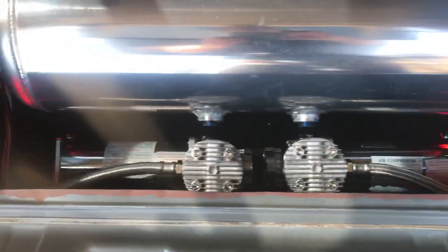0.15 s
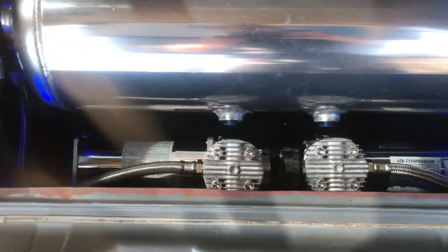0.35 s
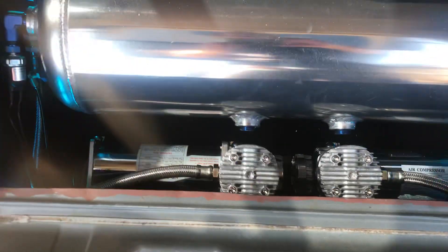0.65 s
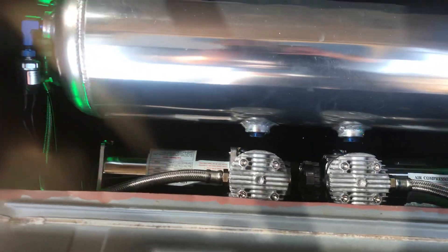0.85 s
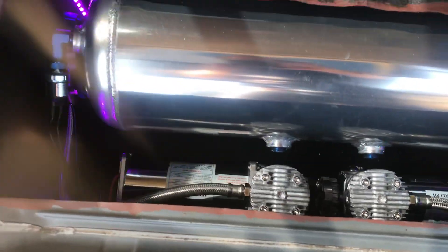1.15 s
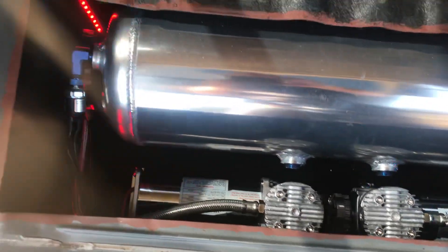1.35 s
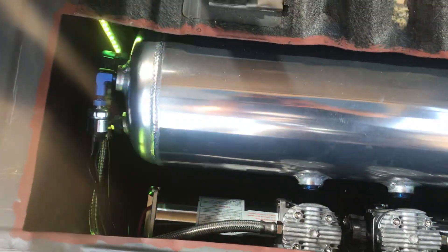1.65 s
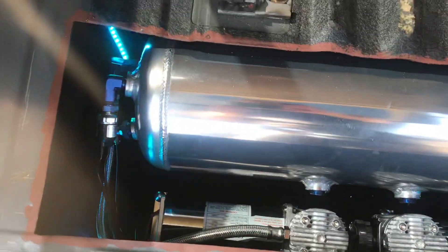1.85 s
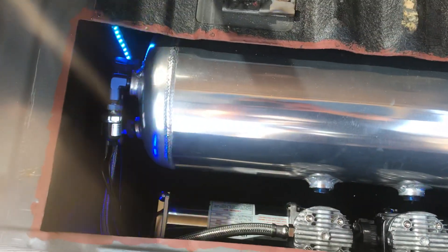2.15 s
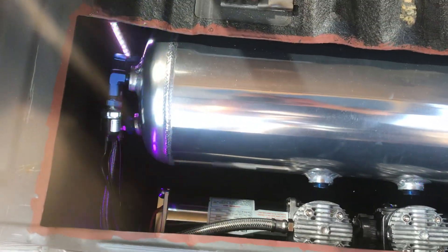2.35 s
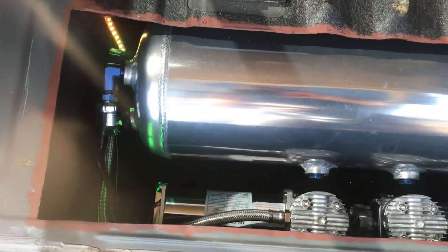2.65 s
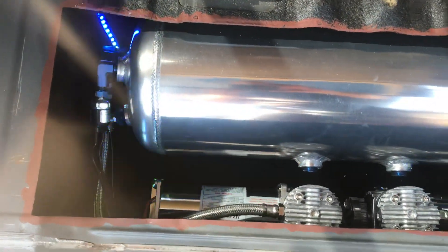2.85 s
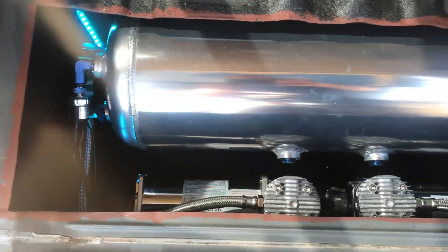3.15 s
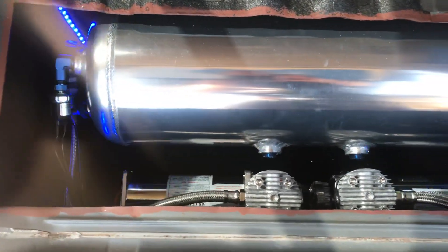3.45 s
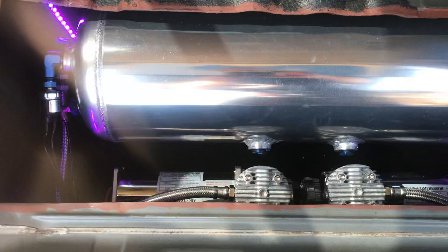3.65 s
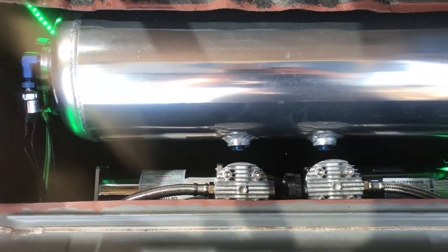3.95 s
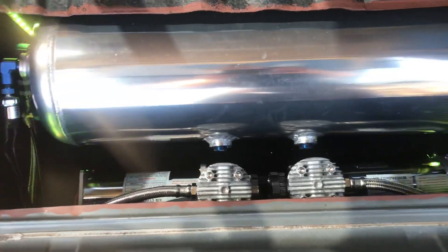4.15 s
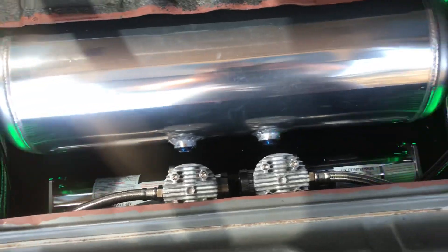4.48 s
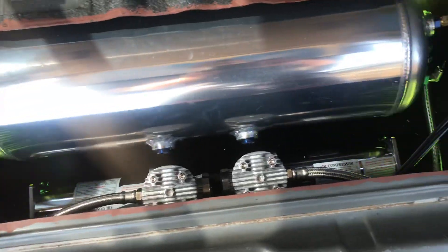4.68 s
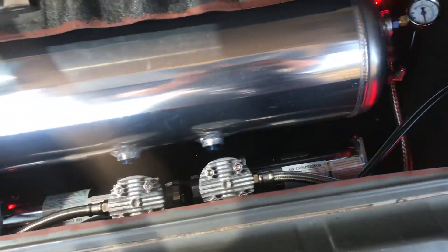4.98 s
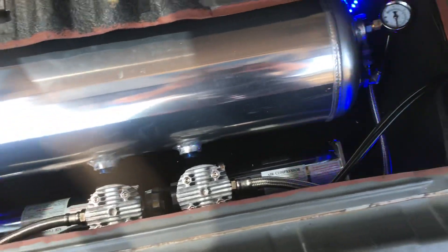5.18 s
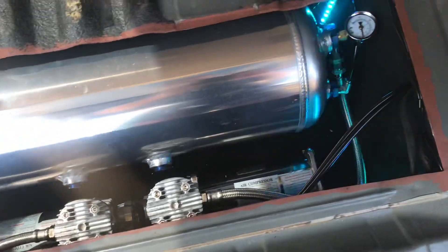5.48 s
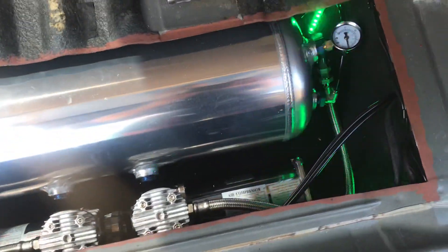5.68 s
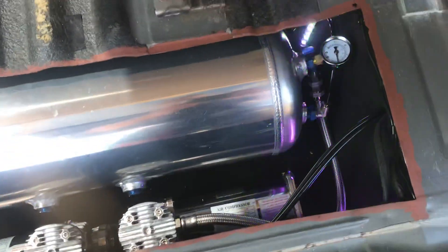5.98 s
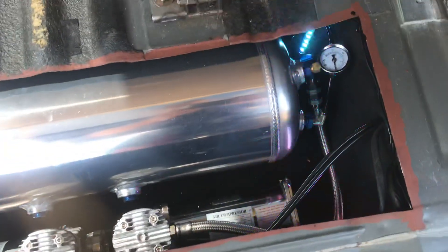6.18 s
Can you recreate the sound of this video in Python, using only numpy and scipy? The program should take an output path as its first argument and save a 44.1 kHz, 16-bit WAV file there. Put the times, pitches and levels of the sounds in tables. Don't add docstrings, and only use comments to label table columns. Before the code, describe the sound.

A close, loud mechanical hum from twin pumps in a metal compartment, already running at the start and still running at the end. The deep buzzing pulses in a quick beat, over rattling metal and rapid soft puffs of air. About halfway the bass changes character slightly. Near five seconds a small cluster of bright valve ticks and a faint high squeal come through, with the drone unchanged.

```python
import sys
import numpy as np
from scipy import signal
from scipy.fft import rfft, irfft, next_fast_len
from scipy.io import wavfile
from scipy.ndimage import uniform_filter1d

SR = 44100
rng = np.random.default_rng(int(sys.argv[2]) if len(sys.argv) > 2 else 0)


def waveform_to_disk(signal):
    frames = np.transpose(np.atleast_2d(signal))
    scaled = np.clip(frames, -1, 1) * 32767
    samples = np.round(scaled).astype(np.int16)
    wavfile.write(sys.argv[1], SR, samples)


def invert_db(level):
    return 10 ** (np.asarray(level, dtype=float) / 20)


N = 278702
T = np.arange(N) / SR
SKIP = 6
TOP_ORDER, SCATTER_DB = 69, 2.5
SHIFT_S, CANCEL_S = 2.9, 1.31
HISS_DB, TOP_DB, HISS_SWAY_DB = -42, -8.5, .5
WALL_HALF = .018

# time_s, speed_hz
SLOW_SPEED = [(0.0, 33.288), (0.7, 33.302), (1.4, 33.312), (2.1, 33.309), (2.8, 33.275), (3.5, 33.233),
              (4.2, 33.205), (4.9, 33.191), (5.6, 33.192), (6.32, 33.193)]
# time_s, speed_hz
FAST_SPEED = [(0.0, 36.4), (0.7, 36.396), (1.4, 36.397), (2.1, 36.404), (2.8, 36.409), (3.5, 36.408),
              (4.2, 36.408), (4.9, 36.418), (5.6, 36.429), (6.32, 36.442)]
# shaft_order, left_db, middle_db, right_db
SLOW_ORDERS = [(1, -47, -49, -50), (2, -25, -26, -27), (3, -36, -36, -37), (4, -29, -30, -27),
               (5, -41, -42, -41), (6, -31, -32, -31), (7, -30, -31, -31), (8, -32, -33, -28),
               (9, -45, -46, -44), (11, -40, -41, -56), (12, -39, -37, -40), (13, -35, -33, -35),
               (14, -37, -35, -33), (15, -47, -46, -39), (16, -43, -42, -41), (17, -41, -41, -43),
               (18, -39, -40, -50), (19, -42, -42, -49), (48, -54, -51, -50), (26, -42, -44, -54),
               (29, -47, -45, -49), (30, -44, -42, -53), (31, -52, -44, -46), (33, -46, -45, -48),
               (36, -45, -37, -35.5), (37, -47, -46, -54), (41, -46, -52, -58), (66, -57, -55, -47),
               (67, -46, -45, -48), (68, -61, -51, -44)]
# shaft_order, left_db, middle_db, right_db
FAST_ORDERS = [(1, -42, -43, -44), (2, -37, -38, -38), (3, -15, -16, -17), (4, -43, -44, -49),
               (5, -44, -44, -40), (6, -27, -27, -28), (7, -34, -34, -38), (8, -37, -37, -36),
               (9, -42, -43, -41), (11, -47, -46, -46), (12, -39, -38, -36), (13, -42, -40, -38),
               (14, -35, -35, -34), (16, -52, -52, -43), (17, -46, -49, -55), (18, -45, -45, -41),
               (20, -44, -47, -50), (22, -42, -42, -49), (43, -54, -48, -49), (24, -56, -55, -46),
               (26, -43, -44, -47), (27, -43, -42, -50), (28, -48, -49, -46), (47, -56, -57, -49),
               (37, -50, -52, -48), (44, -53, -46, -47), (45, -53, -50, -46.5), (57, -46, -45, -48),
               (61, -56, -50, -53), (62, -54, -51, -51)]
# crank_turns, at_150hz_db, at_550hz_db, at_1100hz_db, at_2000hz_db
SLOW_BLOWS = [(.05, 0, -16, -12, -12), (.53, -30, -14, -8, 0), (.6, -30, 0, 0, -6), (.68, -30, -9, -7, -4),
              (.81, -30, -1, -14, -14), (.88, -30, -14, -7, -12)]
# crank_turns, at_150hz_db, at_550hz_db, at_1100hz_db, at_2000hz_db
FAST_BLOWS = [(.5, 0, -20, -3, -14), (.36, -30, -20, -12, 0), (.4, -30, -4, 0, -8), (.57, -30, -9, -3, -11),
              (.87, -30, 0, -14, -14), (.05, -30, -6, -12, -16)]
SLOW_BASS = [
    (.08, -1.2),
    (.05, 4.5),
    (.05, 4.5),
]
FAST_BASS = [
    (.08, .1),
    (.63, 5.0),
    (.5, .1),
]
# pitch_hz, left_db, middle_db, right_db
FAINT = [(350, -51, -53, -50), (800, -52, -52, -52), (1150, -54, -53, -51), (1470, -60, -56, -60),
         (1660, -58, -54, -50), (1880, -63, -58, -59), (2200, -61, -57, -61), (2500, -62, -59, -63)]
# shaft_order, left_db, middle_db, right_db
SHARED = [
    (23, -38, -35, -45),
    (21, -40.5, -45, -48),
]
# time_s, place (0 left, 1 middle, 2 right)
PLACE = [(0, 0.8), (1, -0.5), (2, 0.2), (2.7, 0.07), (3.3, 1), (4, 1.24), (4.8, 2.5), (5.5, 1.5),
         (6.32, 3.5)]
# pitch_hz, centre_s, length_s, change_db
SWELLS = [(765, 2.25, 1.2, -4.5), (765, 4.3, .8, 4.5), (1196, 3.75, .9, 3), (1196, 4.2, .35, -7),
          (1196, 4.5, .4, 2), (1196, 5.45, .5, -4), (2075, .5, .7, -4), (2075, 4.55, .6, 4),
          (2075, 4.85, .2, -4), (2235, .1, .5, -4), (2235, .85, .6, 5), (2235, 3.05, .9, 3),
          (2235, 3.68, .3, -5), (2235, 4.65, 1.5, -6), (2235, 5.95, .45, 3), (2235, 6.17, .2, -2)]
# pitch_hz, density_db_per_hz
RATTLE = [(25, -19), (50, -14), (90, -7), (125, -7), (165, -6), (230, 0), (340, -12), (450, -13),
          (700, -17.5), (1000, -18), (1300, -21.5), (1850, -24), (2300, -24), (3300, -60)]
# pitch_hz, density_db_per_hz
HISS = [(1350, -45), (2300, -7), (2660, -11.5), (3570, -10), (4690, -15), (5770, -12), (6990, -13),
        (7570, -15), (8960, -18.5), (10600, -26.5), (15600, -28.5)]
# pitch_hz, width_hz, level_db
HEAD = [(2990, 150, -5), (3520, 51, 0), (3820, 40, -4), (4960, 57, -6), (5660, 210, -1.5), (6970, 290, -5),
        (8120, 160, -12), (8840, 160, -13), (9790, 130, -15), (11700, 200, -18), (12300, 130, -18),
        (13400, 200, -20)]
# pitch_hz, centre_s, length_s, rms_db
SQUEALS = [(3530, .2, .4, -54), (3560, .8, 1.2, -57), (3497, 1.9, 2.8, -55), (3530, 2.1, 1.8, -56),
           (3825, 1.9, 1.0, -56), (3455, 3.8, 1.3, -57), (3752, 3.9, .6, -56), (3752, 4.6, .7, -58),
           (3620, 5.0, .9, -56), (3532, 5.38, .16, -47), (3532, 5.54, .2, -46), (3532, 5.69, .14, -49),
           (3822, 5.6, 2.6, -56), (3620, 6.1, .8, -56), (3453, 5.6, 1.8, -59)]
# start_s, peak_db
TICKS = [(0.2578, -39), (0.4224, -37), (2.1819, -38), (2.6219, -39), (4.7646, -39), (4.7915, -29),
         (4.8723, -39), (4.9018, -37), (4.9811, -39), (5.0115, -26), (5.0384, -29), (5.1198, -39),
         (5.6416, -39), (5.67, -39), (5.7788, -41), (6.2447, -39)]
# pitch_hz, gain_db, lag_rad
SHIFT = [(30, -1.5, .4), (66, -1.5, .7), (110, -0.65, .8), (220, -0.45, .85), (500, 1, .35), (1500, 1, 0)]


def evened(x):
    return x / np.sqrt(np.mean(abs(x) ** 2) + 1e-20)


def curve(rows, column=1):
    return np.interp(T, *np.transpose(rows)[[0, column]])


def read(points, hz, column=1):
    f, value = np.transpose(points)[[0, column]]
    return np.interp(np.log(hz + 1), np.log(f + 1), value)


def drift(rate_hz, t, every=1):
    coarse = t[::every]
    waves = [np.sin(2 * np.pi * (f * coarse + rng.random())) / np.sqrt(f)
             for f in rate_hz * np.geomspace(1 / 20, 1, num=8)]
    return np.interp(t, coarse, evened(sum(waves)))


def coloured(x, gain):
    size = next_fast_len(N)
    return irfft(rfft(x, size) * gain(np.fft.rfftfreq(size, 1 / SR)), size)[:N]


def bump(t, centre_s, length_s):
    return np.cos(np.pi * np.clip((t - centre_s) / length_s, -.5, .5)) ** 2


def crank(speed):
    return np.cumsum(curve(speed)) / SR


def wall_swell(hz):
    near = np.array([1 / (1 + ((hz - row[0]) / (WALL_HALF * row[0])) ** 4) for row in SWELLS])
    swells = [db * bump(T[::SKIP], centre_s, length_s) for _, centre_s, length_s, db in SWELLS]
    return near.T @ swells, near.max(axis=0)


def filled(orders, speed, shared, faint_db):
    listed = {round(row[0]): row for row in orders}
    scatter_db = SCATTER_DB * rng.standard_normal((TOP_ORDER + 1, 3))
    rows = []
    for k in range(1, TOP_ORDER + 1):
        if k == round(shared[0]):
            continue
        if k in listed:
            rows.append(listed[k])
            continue
        hz = k * speed[0][1]
        rows.append((k, *[read(FAINT, hz, c + 1) + faint_db + scatter_db[k, c] for c in range(3)]))
    return rows


def stack(speed, orders, blows, bass, lead_rad, smear, wander_db, wander_rad, uneven_turns):
    t, place, turns = T[::SKIP], curve(PLACE)[::SKIP], crank(speed)[::SKIP]
    late_turns = uneven_turns * drift(14, t)
    angle, *strength_db = np.transpose(blows)
    swells_db, near = wall_swell(np.transpose(orders)[0].round() * speed[0][1])
    out = 0
    for (order, *place_db), swell_db, held in zip(orders, swells_db, near):
        order = round(order)
        hz = order * speed[0][1]
        if hz < 340:
            at, lag_rad = bass[0 if order < 3 else 1 if order % 3 or order > 6 else 2]
            phase = lag_rad - 2 * np.pi * order * at
        else:
            bands_hz = [300, 400, 750, 900, 1350, 1500]
            weight = [invert_db(np.interp(hz, bands_hz, np.repeat(s, 2)[1:-1])) for s in zip(*strength_db)]
            knock = np.dot(weight, np.exp(-2j * np.pi * order * angle))
            echoes = smear * (1 + 2 * held) * min(hz / 400, 1) ** 2 * np.exp(2j * np.pi * rng.random())
            phase = np.angle(knock + echoes) + lead_rad
        loose = min(hz / 900, 1)
        free = loose * (1 - held)
        level_db = np.interp(place, [0, 1, 2], place_db) + swell_db
        level_db = level_db + wander_db * free * drift(1.2, t, every=100)
        phase = phase + wander_rad * loose * (1 - held / 2) * drift(1.2, t, every=100)
        wave = np.cos(2 * np.pi * order * (turns - late_turns * free) + phase)
        out += np.sqrt(2) * invert_db(level_db) * wave
    return signal.resample_poly(out, SKIP, 1)[:N]


def shared_line():
    out, at = 0, round(CANCEL_S * SR)
    for side, (order, *place_db), speed in zip((1, -1), SHARED, (SLOW_SPEED, FAST_SPEED)):
        turns = crank(speed)
        level_db = np.interp(curve(PLACE), [0, 1, 2], place_db)
        wave = np.cos(2 * np.pi * round(order) * (turns - turns[at]))
        out += side * np.sqrt(2) * invert_db(level_db) * wave
    swell_db = wall_swell(np.array([SHARED[0][0] * SLOW_SPEED[0][1]]))[0][0]
    return out * invert_db(np.interp(T, T[::SKIP], swell_db))


def puffs(speed, opens, rise, fall, spread_db):
    turns = crank(speed) - opens + 1
    part = turns % 1
    size = invert_db(spread_db * rng.standard_normal(400))[turns.astype(int)]
    return size * (1 - np.exp(-part / rise)) * np.exp(-part / fall)


def rattle():
    slow = puffs(SLOW_SPEED, .55, .03, .2, spread_db=3)
    fast = puffs(FAST_SPEED, .34, .01, .15, spread_db=3)
    gate = 1.9 + 1.0 * slow + 0.5 * fast
    steady = coloured(rng.standard_normal(N), lambda hz: invert_db(read(RATTLE, hz)) * (hz < 380))
    shaken = coloured(evened(gate * rng.standard_normal(N)),
                      lambda hz: invert_db(read(RATTLE, hz)) * (hz >= 380))
    return invert_db(-33.0) * evened(steady + shaken)


def head(hz):
    peaks = sum(invert_db(db - read(HISS, f)) / (1 + (2 * (hz - f) / width) ** 2) for f, width, db in HEAD)
    return invert_db(read(HISS, hz)) * (1 + 0.38 * peaks)


def hiss():
    same = np.interp(crank(FAST_SPEED) % 1 * 1210, np.arange(1211), rng.standard_normal(1211))
    swell = invert_db(.8 * drift(2.5, T, every=400))
    air = .5 * evened(same) * swell + rng.standard_normal(N)
    gate = .5 + puffs(FAST_SPEED, .38, .03, .2, spread_db=1.5)
    gate += .25 * puffs(SLOW_SPEED, .68, .033, .9, spread_db=3.5)
    late = 0.53 + 2.1 * puffs(FAST_SPEED, .38, 0.11, 0.093, spread_db=5.0)
    late += 0.53 * puffs(SLOW_SPEED, .6, .03, 0.34, spread_db=0)

    struck = rng.random(N) < 260 / SR * evened(late) ** 2
    tick_db = 3.3 * np.minimum(rng.exponential(1, N), 2.6)
    ticks = struck * invert_db(tick_db) * rng.choice([-1, 1], N)
    dull = rng.random(N) < .6

    body = coloured(evened(gate) * air + 1.4 * ticks * dull,
                    lambda hz: head(hz) / (1 + (hz / 8000) ** 12))
    top = coloured(evened(late) * rng.standard_normal(N) + 3.0 * ticks * ~dull,
                   lambda hz: head(hz) / (1 + (8000 / (hz + 1)) ** 12))
    level_db = HISS_DB + HISS_SWAY_DB * abs(curve(PLACE) - 1)
    return invert_db(level_db) * (evened(body) + invert_db(TOP_DB) * evened(top))


def patchy(x, depth_db):
    z = signal.stft(x, nperseg=512)[2]
    patches = uniform_filter1d(rng.standard_normal(z.shape), size=4, axis=0)
    patches = uniform_filter1d(patches, size=90, axis=1)
    return signal.istft(z * invert_db(depth_db * evened(patches)), nperseg=512)[1][:N]


def squeals():
    throb = evened(1 + .8 * puffs(FAST_SPEED, .36, .05, .3, spread_db=2))
    out = np.zeros(N)
    for hz, centre_s, length_s, db in SQUEALS:
        waver_rad = 1.2 * drift(9, T, every=200)
        whistle = np.sin(2 * np.pi * hz * T + waver_rad)
        out += np.sqrt(2) * invert_db(db) * bump(T, centre_s, length_s) * whistle
    return throb * out


def hard_ticks():
    out, t = np.zeros(N + 400), np.arange(400) / SR
    shape = (1 - np.exp(-t / .0004)) * np.exp(-t / 0.0023)
    for start_s, db in TICKS:
        out[round(start_s * SR):][:400] += invert_db(db - 2) * rng.standard_normal(400) * shape
    return coloured(out[:N], lambda hz: 1 / (1 + (10500 / (hz + 1)) ** 6))


def scene():
    slow = stack(SLOW_SPEED, filled(SLOW_ORDERS, SLOW_SPEED, SHARED[0], faint_db=-1.5),
                 SLOW_BLOWS, SLOW_BASS, lead_rad=1.0, smear=.2,
                 wander_db=1.2, wander_rad=.15, uneven_turns=.0008)
    fast = stack(FAST_SPEED, filled(FAST_ORDERS, FAST_SPEED, SHARED[1], faint_db=1.5),
                 FAST_BLOWS, FAST_BASS, lead_rad=2.1, smear=.15,
                 wander_db=1.2, wander_rad=.1, uneven_turns=.0005)
    air = patchy(hiss(), depth_db=.9)
    return (slow + fast + shared_line() + rattle() + air + squeals() + hard_ticks())[None]


def band_limit(x):
    return signal.sosfilt(signal.butter(12, 15710, fs=SR, output="sos"), x)


def record(dry):
    lag = coloured(dry[0], lambda hz: np.exp(-1j * read(SHIFT, hz, column=2)))
    after = np.clip((T - SHIFT_S) / 0.031 + .5, 0, 1)
    fade = 1 - np.clip((T - SHIFT_S) / 4.2, 0, 1)
    step = coloured(lag * fade, lambda hz: invert_db(read(SHIFT, hz)) - 1)
    heard = dry[0] + after * (lag + 0.48 * step - dry[0])
    heard = .95 * np.tanh(heard / .88)
    return band_limit(heard[None])


dry = scene()
out = record(dry)
waveform_to_disk(out)
```